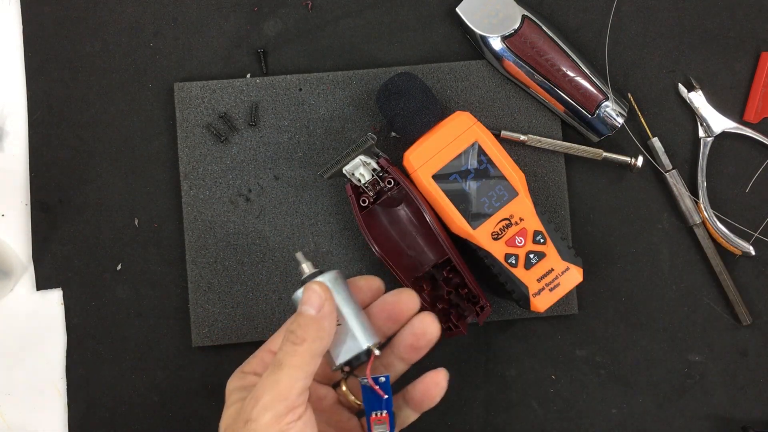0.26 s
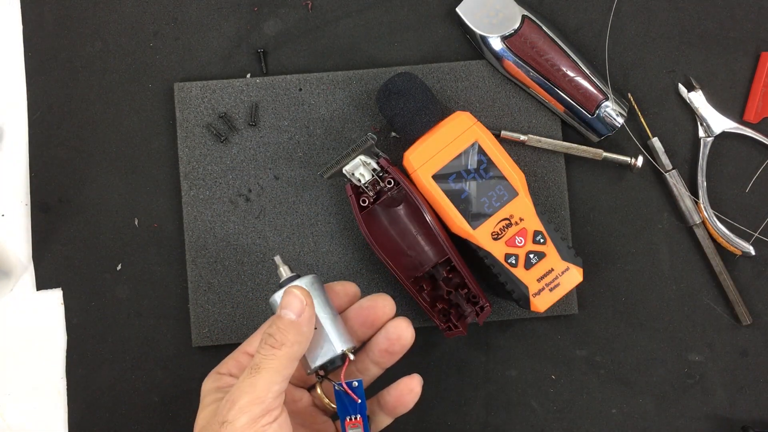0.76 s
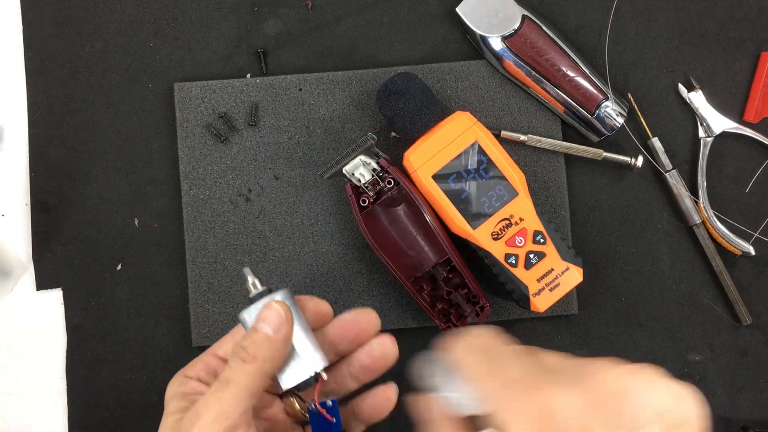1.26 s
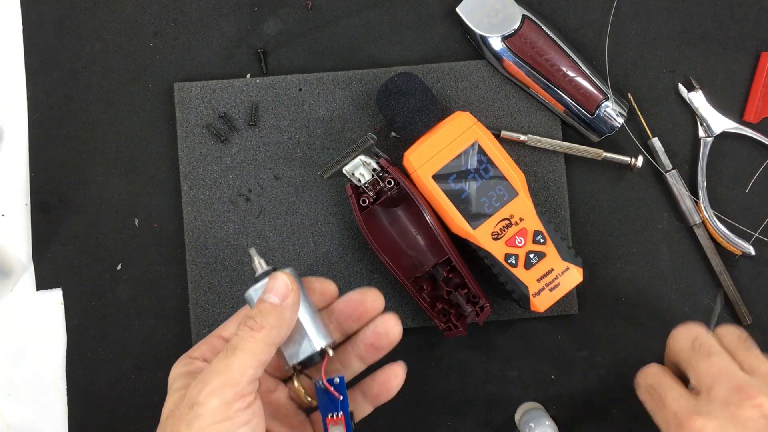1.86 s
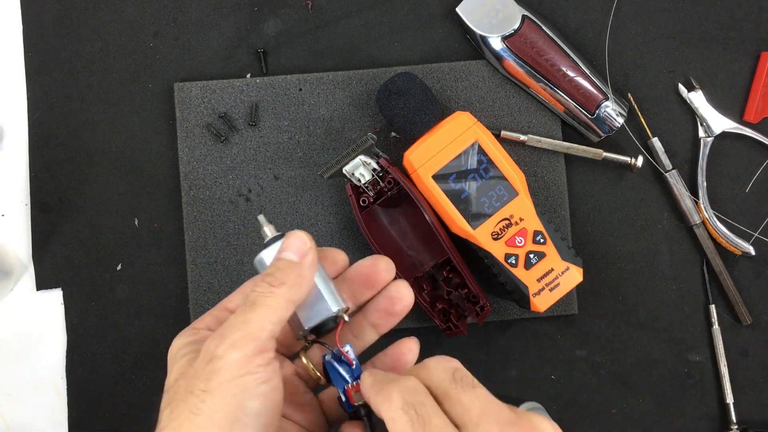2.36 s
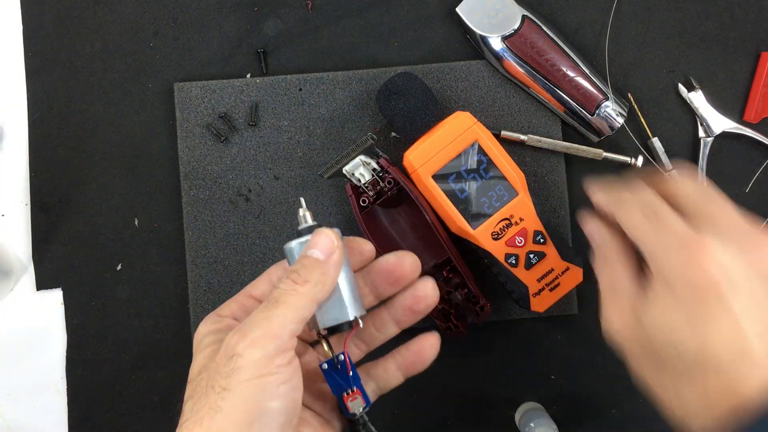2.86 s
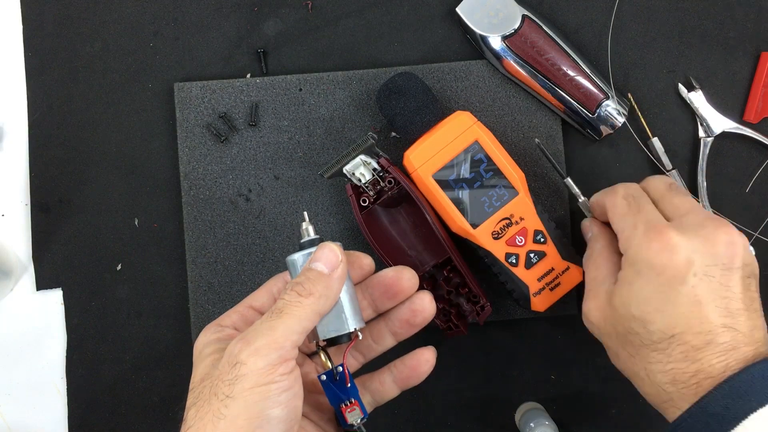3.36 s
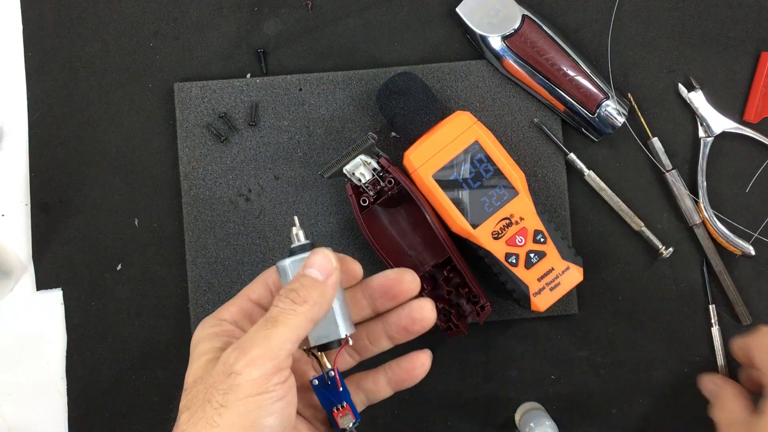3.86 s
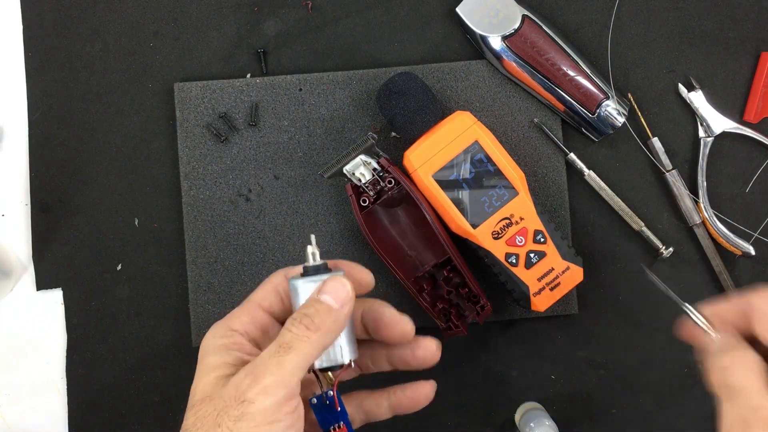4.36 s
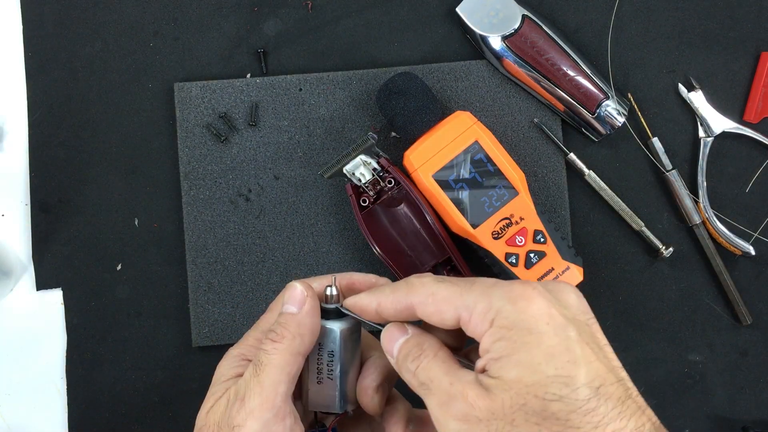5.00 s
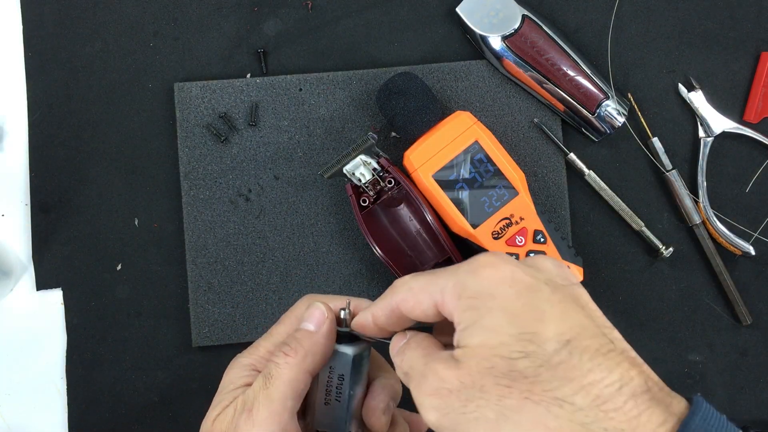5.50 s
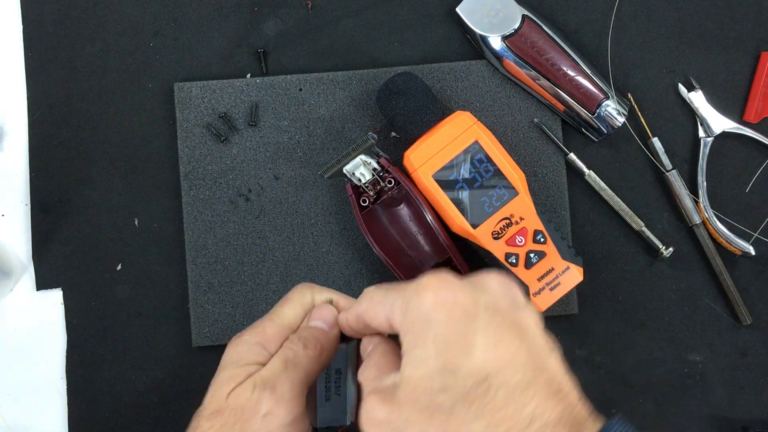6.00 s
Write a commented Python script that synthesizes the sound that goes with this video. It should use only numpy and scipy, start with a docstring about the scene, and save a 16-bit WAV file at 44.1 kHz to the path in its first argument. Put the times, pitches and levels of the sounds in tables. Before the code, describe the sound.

From 0 to 2.9 seconds a small bare motor runs close by at constant speed: a bright, grainy brush hiss with a fine fast buzz and faint whine underneath, its metallic colour shifting slightly between about 0.6 and 1.6 as the grip changes. A faint knock comes at 1.95, then a cluster of plastic knocks with a dull bench thud at 2.35-2.5. At 2.89 a hard, bright switch snap cuts the power; the hiss fades and dulls, rattling and ticking ever slower until rest by 3.2. Around 3.4-3.6 a screwdriver scrapes with a short swell and small ringing clinks, with another clink near 3.86. Two firmer knocks with metal ticks follow at 4.44 and 4.58, then tiny ticks at 4.78 and 5.25. Faint rubbing ends it near 6.1, over low small-room rumble and wavering hum.

```python
"""Small motor coasting to rest

A bare five-pole trimmer motor runs in a hand over a workbench: bursts of noise at its commutator bars
make the brush hiss, sines locked to its shaft the whine. The other hand knocks the lead and snaps the
switch off: filtered clicks. The rotor coasts to rest, ticking ever slower. A small screwdriver slides
onto the mat (swelling noise, ringing sines) and a tool clicks on the motor. The small room hums."""
import sys
import numpy as np
from scipy import signal
from scipy.fft import rfft, irfft, next_fast_len
from scipy.io import wavfile
from scipy.ndimage import uniform_filter1d, map_coordinates

SR = 44100
rng = np.random.default_rng(int(sys.argv[2]) if len(sys.argv) > 2 else 0)


def bounce(signal):
    """Save signal as a 16-bit WAV file at the path given by the first command-line argument."""
    frames = np.transpose(np.atleast_2d(signal))
    limited = np.clip(frames, -1, 1)
    pcm = np.round(limited * 32767).astype(np.int16)
    wavfile.write(sys.argv[1], SR, pcm)


N = 275184

# shaft rate under power (turns per s), moment the switch opens, time to brake to rest
RUN_HZ, OFF_S, COAST_S = 103.55, 2.893, 0.31


def amp(db):
    """Amplitude ratio of a level in dB."""
    return 10 ** (np.asarray(db) / 20)


def unit(x):
    """x scaled to rms 1."""
    return x / np.sqrt(np.mean(x ** 2) + 1e-20)


def along(points, hz):
    """(Hz, value) points interpolated on a log frequency axis."""
    point_hz, values = np.transpose(points)
    return np.interp(np.log(hz + 1), np.log(point_hz), values)


def curve(rows):
    """(s, value) rows as one value per sample."""
    return np.interp(np.arange(N) / SR, *np.transpose(rows))


def wobble(rate_hz):
    """Smooth random curve with rate_hz knots a second."""
    count = int(N * rate_hz / SR) + 4
    grid = np.arange(8 * count) / 8
    smooth = map_coordinates(rng.standard_normal(count), [grid], mode="nearest")
    return np.interp(np.arange(N) * rate_hz / SR, grid, smooth)


def coloured(x, gain_db, size=4096):
    """x through the minimum-phase filter whose gain in dB is a function of frequency."""
    cepstrum = irfft(np.log(amp(gain_db(np.fft.rfftfreq(size, 1 / SR)))))
    # fold onto positive time: causal
    cepstrum[1:size // 2] *= 2
    cepstrum[size // 2 + 1:] = 0
    impulse = irfft(np.exp(rfft(cepstrum)))
    return signal.oaconvolve(x, impulse)[:len(x)]


def lifts(peaks, hz):
    """Summed gain in dB of (centre Hz, width Hz, dB) resonances."""
    return sum(db / (1 + (2 * (hz - centre) / width) ** 2) for centre, width, db in peaks)


def noise(spectrum):
    """Noise of rms 1 with the given colour."""
    size = next_fast_len(N)
    gain = amp(along(spectrum, np.fft.rfftfreq(size, 1 / SR)))
    return unit(irfft(rfft(rng.standard_normal(size)) * gain, size)[:N])


def add(track, start_s, sound):
    """Mix a sound into the track at start_s."""
    part = track[round(start_s * SR):][:len(sound)]
    part += sound[:len(part)]


def clicks(rows, body, grit=.3, rise_s=0.00031):
    """Each contact is one sharp push and a brief gritty chatter, coloured by the struck body."""
    track, t = np.zeros(N), np.arange(SR // 10) / SR
    for start_s, level_db, tilt_db, t60_s in rows:
        decay = amp(-60 * t / t60_s)
        fade = decay * (1 - np.exp(-t / rise_s))
        # many tiny contacts: random phase, flat spectrum
        phase = np.angle(rfft(rng.standard_normal(len(t)) * fade))
        even = irfft(np.exp(1j * phase), len(t))
        chatter = np.linalg.norm(fade) * even * np.minimum(1, 10 * decay)
        force = (t == 0) + grit * chatter
        # tilt in dB per octave above 1 kHz
        click = coloured(force, lambda hz: along(body, hz) + tilt_db * np.log2(np.maximum(hz, 1000) / 1000))
        # level as if all the energy fell within 2 ms
        add(track, start_s, amp(level_db) * click / np.sqrt(np.sum(click ** 2) / (SR // 500)))
    return track


def shaft():
    """Turns per second: near steady under power, then friction brakes the rotor evenly to rest."""
    left = np.clip(1 - (np.arange(N) / SR - OFF_S) / COAST_S, 0, 1)
    return RUN_HZ * left * (1 + .0015 * wobble(5))


def brushes(speed, turns, scrape_s=0.0011, steady=0.57, scatter_db=2, lean_db=1.53, flutter_db=1.03,
            catch_db=3, level_db=-41.5, speed_power=1.2):
    """Five commutator bars scrape past the brushes on each turn, louder the faster they go."""
    bars = 5 * turns
    bar = bars.astype(int)
    since_s = (np.arange(N) - np.searchsorted(bar, bar)) / SR
    size = amp(scatter_db * rng.standard_normal(bar[-1] + 1))[bar]
    # burst at each bar edge; the rubbing between edges fades with speed
    contact = size * np.exp(-since_s / scrape_s) + steady * np.sqrt(speed / RUN_HZ)
    # level out over 50 ms
    contact = contact / np.sqrt(np.abs(uniform_filter1d(contact ** 2, SR // 20)) + 1e-3)
    # rotor slightly out of true: brush pressure swings once a turn
    swing_db = lean_db * np.sin(2 * np.pi * turns) + flutter_db * wobble(160) + 0.54 * wobble(25.03)
    # a brush catches and scrapes harder for a few milliseconds
    catches_db = catch_db * np.clip(wobble(110) - 1, 0, 2)
    friction = contact * unit(amp(swing_db + catches_db)) * rng.standard_normal(N)
    level = amp(level_db) * (speed / RUN_HZ) ** speed_power
    return level * can(friction, speed) * np.std(friction)


def can(friction, speed, patchy_db=1.83, hollow_hz=800, slow_tilt_db=-2.5):
    """The steel can colours the friction; grip shifts its resonances, and slow rubbing is duller."""
    # finger grip on the can: time_s, grip (0-1)
    grip_rows = [(0, 0.1), (.55, 0.2), (.64, 1), (1.17, 1), (1.23, 0), (1.33, 0.7), (1.6, 0), (2, 0.3),
                 (2.65, 0.23), (3.15, 0.6)]
    # resonances that move up with grip, hollow just below: loose_hz, firm_hz, width_hz, lift_db, hollow_db
    shifting = [(5400, 5970, 660, 6.5, -0.5), (9380, 10950, 520, 7, -1), (13600, 14000, 420, -0.5, 0)]
    # brush friction colour: freq_hz, gain_db
    hiss = [(200, -20), (450, -14.5), (800, -15), (1250, -14), (1700, -10), (2300, -10.5), (3400, -8.5),
            (4600, -13), (6000, -8), (7700, -10.5), (9200, -4), (11800, -1.5), (14200, -1), (15800, -8)]
    # steady can resonances: freq_hz, width_hz, lift_db
    steady_peaks = [(680, 130, 5), (980, 130, 3), (2030, 170, 5), (2700, 260, 7), (3000, 120, 3),
                    (3950, 300, 2.5), (9700, 400, 2.5), (11100, 300, 2.5), (11700, 300, 2.5),
                    (15600, 300, 3)]
    hz, t, z = signal.stft(friction, SR, nperseg=512)
    hz = hz[:, None]
    grip = np.interp(t, *np.transpose(grip_rows))
    held_db = 0
    for loose, firm, width, lift_db, hollow_db in shifting:
        centre = loose + grip * (firm - loose)
        pair = [(centre, width, lift_db), (centre - hollow_hz, width, hollow_db)]
        held_db = held_db + lifts(pair, hz)
    # random patches, 2 bins by 30 frames
    patches = uniform_filter1d(rng.standard_normal(z.shape), size=2, axis=0)
    patches = unit(uniform_filter1d(patches, size=30, axis=1))
    slowed = 1 - np.interp(t * SR, np.arange(N), speed) / RUN_HZ
    dulling_db = slow_tilt_db * slowed * np.log2(np.clip(hz, 2500, None) / 8000)
    gain = amp(held_db + patchy_db * patches + dulling_db)
    shaped = signal.istft(z * gain, SR, nperseg=512)[1][:N]
    return unit(coloured(shaped, lambda f: along(hiss, f) + lifts(steady_peaks, f)))


def whine(speed, turns, waver_db=0.86, phase_blur=0.42):
    """Magnetic pull on the rotor poles sounds at multiples of the shaft rate, weaker as it slows."""
    # whine at full speed: shaft_multiple, level_db (rms)
    partials = [(5, -76), (6, -71), (9, -70), (10, -65), (14, -70), (15, -74), (16, -71.5), (20, -70.5),
                (26, -72), (31, -74)]
    tones = 0
    for multiple, level_db in partials:
        level = amp(level_db + waver_db * wobble(9.03))
        phase = 2 * np.pi * (round(multiple) * turns + rng.random()) + phase_blur * wobble(40)
        tones = tones + level * np.sin(phase)
    return np.sqrt(2) * tones * speed / RUN_HZ


def background(air_db=-54.5, hum_hz=64, waver_db=2, drone_hz=48, octave_db=-2):
    """Room rumble and faint hiss as noise; a wavering low hum and a deep drone with its octave as sines."""
    # hum: time_s, level_db
    hum_rows = [(0, -60.5), (2.8, -62), (3.35, -52), (3.8, -61.5), (4.8, -51.5), (5.65, -55.5), (6.15, -43)]
    # drone fundamental, comes and goes: time_s, level_db
    drone_rows = [(.5, -68), (.75, -55), (1.55, -55), (1.8, -63.5), (2.7, -61.5), (4.2, -76), (5.2, -60.5)]
    # rumble and hiss colour: freq_hz, density_db
    air = [(15, -21), (29, -4), (38, -40), (48, 2), (80, 1), (110, -7), (190, -7.5), (300, -22),
           (450, -20.5), (800, -26), (1300, -29.5), (4600, -44.5), (10500, -43), (11800, -38),
           (15800, -42.5)]

    def tone(hz):
        """Sine of rms 1 with a wandering phase."""
        return np.sqrt(2) * np.sin(2 * np.pi * hz * np.arange(N) / SR + 0.87 * wobble(4.9))

    drone = amp(curve(drone_rows)) * (tone(drone_hz) + amp(octave_db) * tone(2 * drone_hz))
    hum = amp(curve(hum_rows) + waver_db * wobble(3.964)) * tone(hum_hz)
    return amp(air_db) * noise(air) + hum + drone


def plastic_knocks():
    """Hard plastic knocks: slow-rising, very gritty clicks through the plastic's resonances."""
    # knocks: start_s, level_db, tilt_db_per_octave, t60_s
    hits = [(1.954, -46.5, -7, 0.024), (2.3475, -32, -7.5, 0.0097), (2.3665, -37, 1.5, 0.0051),
            (2.38, -41, -11, 0.0087), (2.4797, -28, 0, 0.012), (3.516, -52, 4, 0.017),
            (3.921, -57, -8, 0.039), (4.3185, -55.5, 2.5, 0.012), (4.372, -54, -10, .014),
            (4.4405, -31.5, -0.5, .014), (4.494, -51, -11, 0.06), (4.5808, -28.5, 3, 0.012),
            (6.0865, -57.5, 6.5, 0.0092)]
    # plastic colour: freq_hz, gain_db
    plastic = [(300, -21), (950, -13), (1350, 5), (1680, 1.5), (1980, -15), (2400, 1), (2850, 1.5),
               (3500, -12), (4300, -3), (5100, -13.5), (5800, -9), (8500, -18), (11000, -19.5),
               (15000, -30)]
    return clicks(hits, plastic, grit=2.7, rise_s=0.0026)


def bumps(rise_s=0.0021, press=0.22, relax_s=0.0078, scuff_db=14):
    """The bench top thuds in its low modes, pitch sagging as the pressure lets go, with a dull scuff."""
    # soft bumps: start_s, level_db, mode_tilt_db_per_octave, scuff_t60_s
    hits = [(2.353, -38, -25, .013), (2.367, -27, -13, 0.042), (2.396, -43.5, 0, 0.023),
            (3.4055, -50, 10.5, .006), (4.933, -53.5, 9.5, .0056)]
    # bench modes: settled_hz, level_db, t60_s
    modes = [(108, -10, 0.034), (207.4, -4, 0.21), (312, 1, 0.067), (399, -3, 0.097), (590, -17, .035)]
    track, t = np.zeros(N), np.arange(SR // 3) / SR
    # pitch starts high by the fraction press
    sagging_s = t + press * relax_s * (1 - np.exp(-t / relax_s))
    for start_s, level_db, tilt_db, t60_s in hits:
        ring = 0
        for hz, mode_db, mode_t60_s in modes:
            fade_db = mode_db + tilt_db * np.log2(hz / modes[1][0]) - 60 * t / mode_t60_s
            ring = ring + amp(fade_db) * np.sin(2 * np.pi * hz * sagging_s)
        rub = rng.standard_normal(len(t)) * amp(-60 * t / t60_s)
        scuff = coloured(rub, lambda hz: along([(400, 5.5), (1300, -27)], hz))
        thud = (ring + amp(scuff_db) * scuff) * (1 - np.exp(-t / rise_s))
        add(track, start_s, amp(level_db) * thud)
    return track


def switch(count=3):
    """One hard snap, then contact bounces, each weaker, duller and longer."""
    # switch colour: freq_hz, gain_db
    body = [(500, -40), (1800, -39), (2800, -13), (5800, -9.5), (7600, -21.5), (9000, -3.5), (10000, -15),
            (11000, 2), (12100, -3), (13400, 5), (15800, -2)]
    snap_s, snap_db, snap_tilt_db, snap_t60_s = 2.8936, -16.5, 1.5, .0035
    bounce_s, loss_db, dull_db, stretch = .0012, 8.5, 4, 2.3
    contacts = [(snap_s + k * bounce_s, snap_db - k * loss_db, snap_tilt_db - k * dull_db,
                 snap_t60_s * stretch ** k) for k in range(count)]
    return clicks(contacts, body, grit=.17)


def rotor_ring(speed, turns, ring_hz=940, width_hz=200, rough=0.24, count=14):
    """The freed rotor rattles; falling overtones of its five poles pass through a narrow resonance."""
    level_db, rise_s, fade_s = -64, 0.027, 0.037
    coast = slice(round(OFF_S * SR), round((OFF_S + COAST_S) * SR))
    orders = 5 * np.arange(2, count)[:, None]
    gains = 1 / (1 + (2 * (orders * speed[coast] - ring_hz) / width_hz) ** 2)
    waves = np.sin(2 * np.pi * (orders * turns[coast] + rng.random(orders.shape)))
    strands = np.zeros(N)
    # even out the level as overtones pass
    strands[coast] = np.sum(gains * waves, axis=0) / np.sqrt(np.sum(gains ** 2, axis=0) / 2 + 0.16)

    def band_db(hz):
        """The resonance as a noise band, floored at -80 dB."""
        return np.maximum(-20 * np.log10(1 + (2 * (hz - ring_hz) / width_hz) ** 2), -80)

    band = coloured(rng.standard_normal(N), band_db)
    free_s = np.arange(N) / SR - OFF_S
    envelope = np.clip(np.minimum(free_s / rise_s, (COAST_S - free_s) / fade_s), 0, 1)
    return amp(level_db) * envelope * (strands + rough * unit(band))


def tool_ticks():
    """The tool's tip ticks on metal: clicks through the tip's resonances."""
    # ticks: start_s, level_db, tilt_db_per_octave, t60_s
    hits = [(3.4028, -46, -3.5, 0.023), (3.4063, -41.5, -3.5, 0.02), (4.4205, -43, 5.5, 0.044),
            (4.4265, -43, 7, 0.047), (4.7796, -40.5, 5.5, 0.012), (5.2486, -38.5, 2.5, 0.025)]
    # tip colour: freq_hz, gain_db
    tip = [(500, -12.5), (1050, 0), (1800, -9.5), (3000, -8), (5600, -10), (6400, 0), (6900, -7),
           (7500, -2), (8800, -6), (11500, -5), (15500, -5.5)]
    return clicks(hits, tip, grit=0.45)


def sliding(grain_db=4, range_db=20.5):
    """Steel and skin drag over mat and motor in small catches; each stroke swells and dies away."""
    # strokes, rise and fall each spanning range_db: peak_s, level_db, rise_s, fall_s
    strokes = [(3.46, -49.5, 0.055, 0.062), (3.527, -43.5, 0.054, 0.035), (3.58, -69, 0.046, .2),
               (3.89, -69, 0.048, .08), (4.435, -57, .035, .045), (4.6, -65, 0.17, 0.13),
               (4.9, -67, .2, 0.068), (6.05, -70, .12, .08), (6.17, -63, 0.079, .05)]
    # sliding colour: freq_hz, density_db
    mat = [(300, -28), (1000, -2), (2400, 1), (4000, -6.5), (7000, -6.5), (9000, -4.5), (13000, -6.5),
           (15800, -4.5)]
    t = np.arange(N) / SR
    pressure = 0
    for peak_s, level_db, rise_s, fall_s in strokes:
        away = np.maximum((peak_s - t) / rise_s, (t - peak_s) / fall_s)
        pressure = pressure + amp(level_db - range_db * away)
    return pressure * unit(noise(mat) * amp(grain_db * wobble(500)))


def screwdriver(ring_db=-5, clink_t60_s=.02):
    """Each touch clicks and leaves the steel shank ringing briefly, damped by the mat."""
    # steel touches down: start_s, level_db, tilt_db_per_octave
    touches = [(3.432, -51, -13), (3.442, -47.5, -18), (3.4556, -34.5, -11.5), (3.479, -48, -9),
               (3.506, -46, -10), (3.582, -59, -15), (3.857, -39, 2), (3.877, -58, -4), (3.9336, -51, 6)]
    # steel click colour: freq_hz, gain_db
    steel = [(600, -42.5), (2600, -26), (3300, -4.5), (4200, -25), (5200, 0.5), (6000, -6), (8800, -2),
             (10000, 4), (10700, 13.5), (11400, 5), (12500, -1), (15500, -8)]
    # shank modes: pitch_hz, level_db, t60_s
    modes = [(3355, -11, .05), (5000, -3, 0.049), (5400, -2, .04), (10650, 0, .055), (10900, -2, .04)]
    track = clicks([(*touch, clink_t60_s) for touch in touches], steel, grit=0.26)
    t = np.arange(SR // 8) / SR
    for start_s, level_db, tilt_db in touches:
        ring = 0
        for hz, mode_db, t60_s in modes:
            strike_db = mode_db + tilt_db * np.log2(hz / modes[-1][0]) + rng.normal(0, 2)
            ring = ring + amp(strike_db - 60 * t / t60_s) * np.sin(2 * np.pi * hz * t)
        add(track, start_s, amp(level_db + ring_db) * ring / np.abs(ring).max())
    return track


def room(x):
    """The small room's answer after 4 ms: a decaying noise tail whose treble dies first."""
    # reverberation: freq_hz, t60_s
    decay = [(200, 0.44), (2000, 0.17), (12000, 0.097)]
    hz, t, z = signal.stft(rng.standard_normal(SR // 2), SR, nperseg=256)
    tail = signal.istft(z * amp(-60 * t / along(decay, hz)[:, None]), SR, nperseg=256)[1]
    return signal.fftconvolve(x, np.pad(tail / np.linalg.norm(tail), (SR // 250, 0)))[:N]


def scene(motor_room_db=-15, knock_room_db=-14, tick_room_db=-17):
    """The motor and the handling sounds, close by, in the room."""
    speed = shaft()
    turns = np.cumsum(speed) / SR
    motor = brushes(speed, turns) + whine(speed, turns) + rotor_ring(speed, turns)
    knocks = plastic_knocks() + bumps() + sliding()
    ticks = switch() + screwdriver() + tool_ticks()
    echo = room(amp(motor_room_db) * motor + amp(knock_room_db) * knocks + amp(tick_room_db) * ticks)
    return (motor + knocks + ticks + echo + background())[None]


def record(dry, top_hz=15880):
    """Remove everything from the band limit up."""
    size = next_fast_len(N + SR // 2)
    return irfft(rfft(dry, size) * (np.fft.rfftfreq(size, 1 / SR) < top_hz), size)[:, :N]


dry = scene()
out = record(dry)
bounce(out)
```